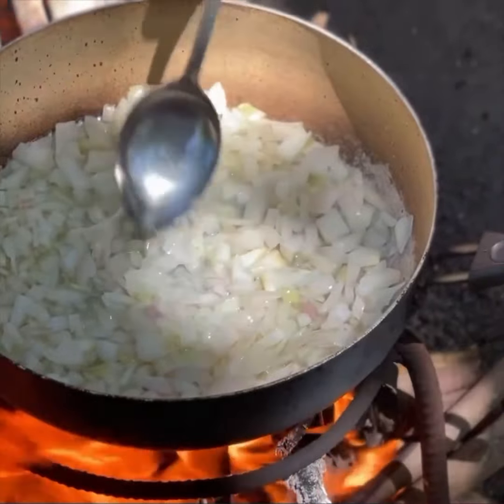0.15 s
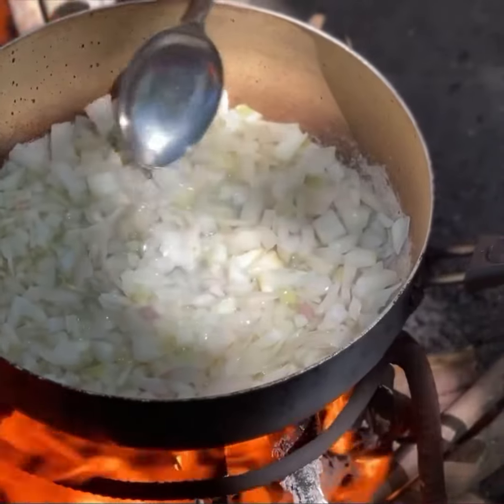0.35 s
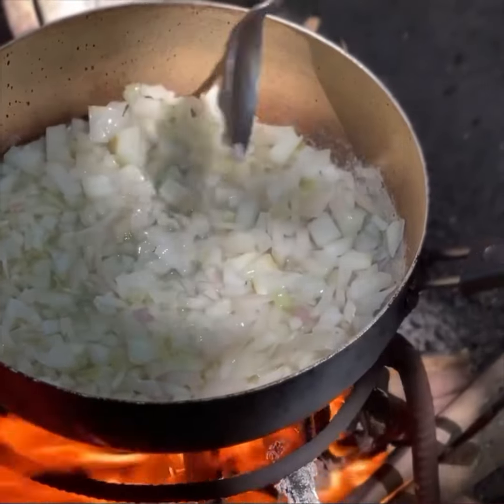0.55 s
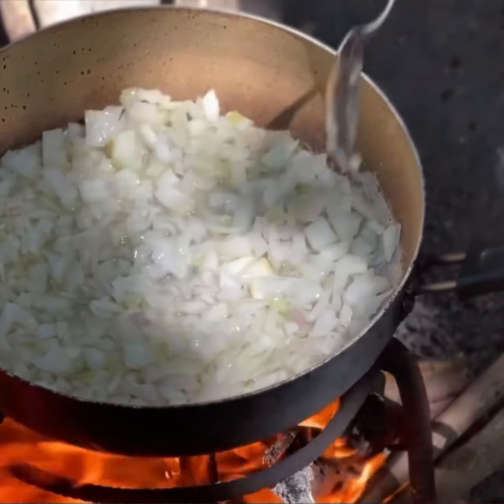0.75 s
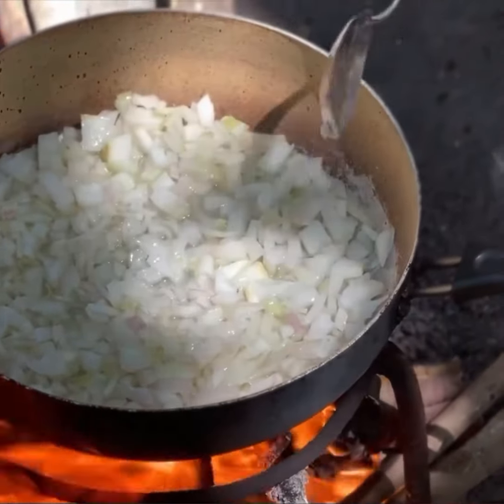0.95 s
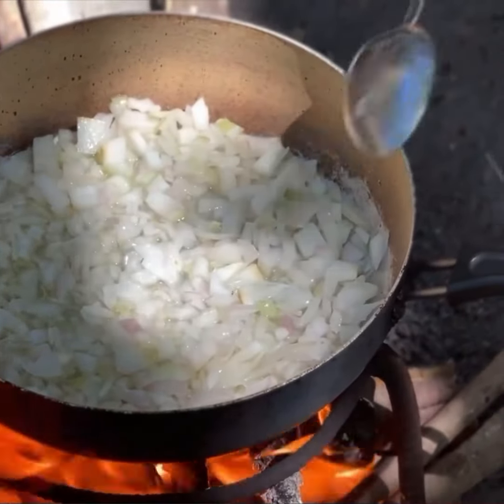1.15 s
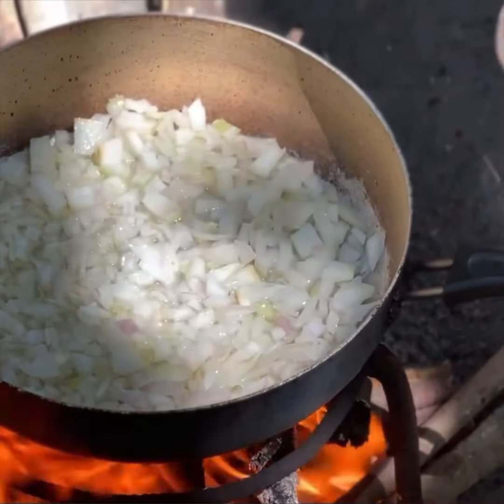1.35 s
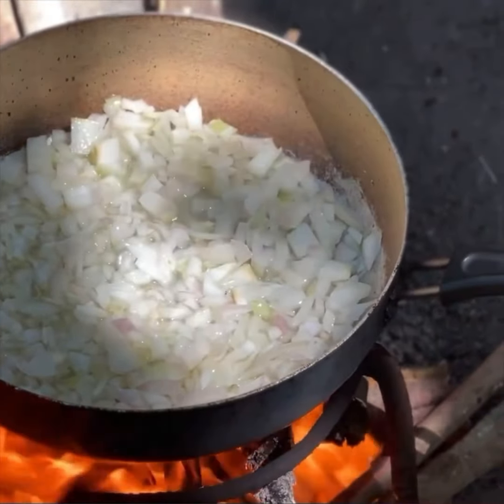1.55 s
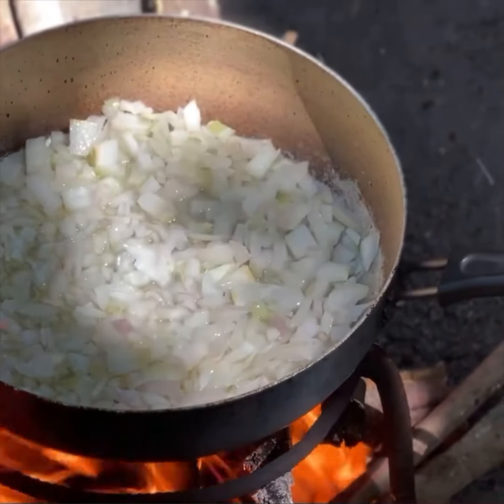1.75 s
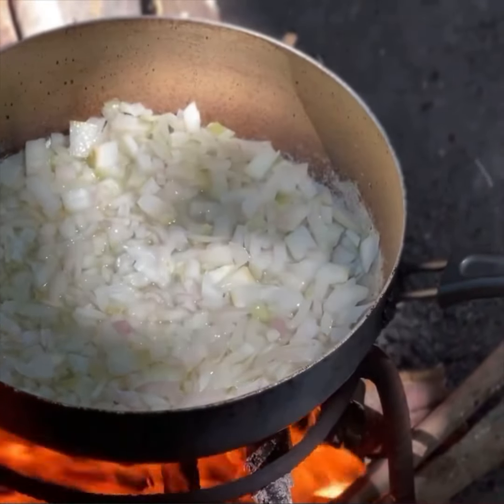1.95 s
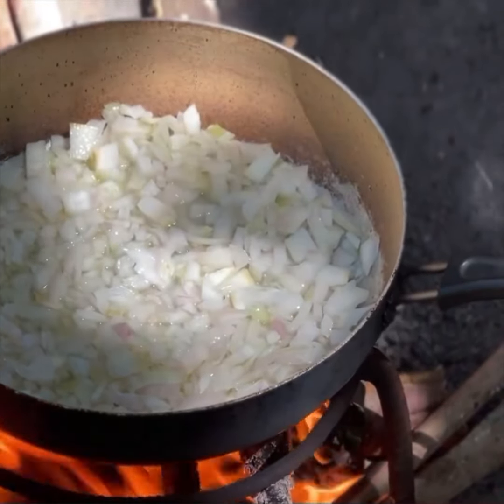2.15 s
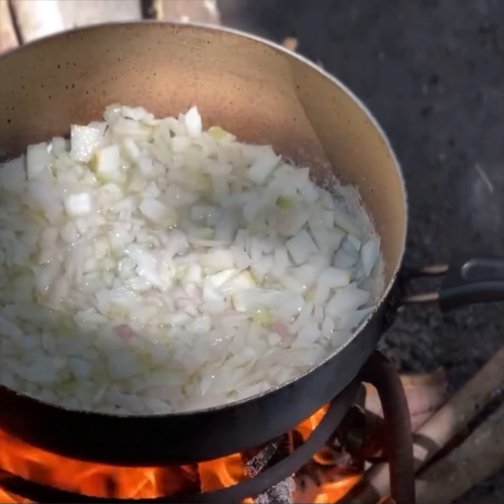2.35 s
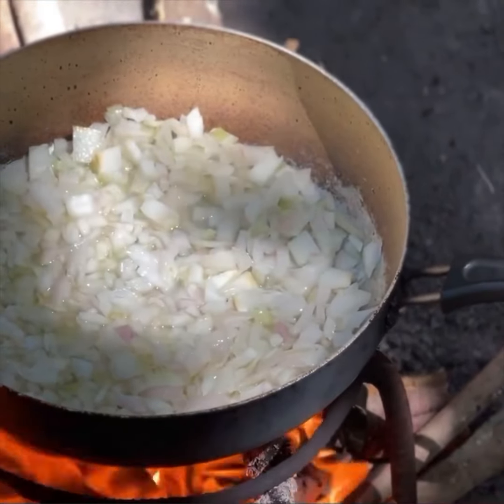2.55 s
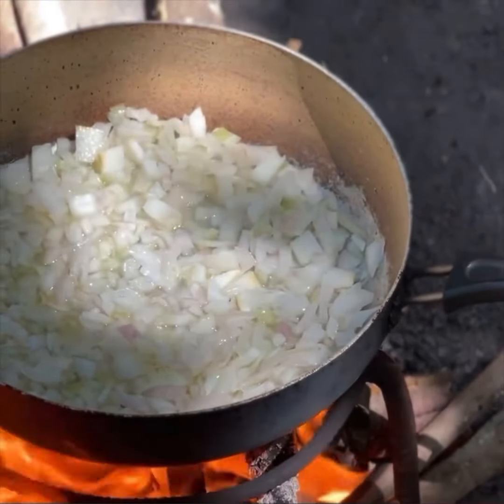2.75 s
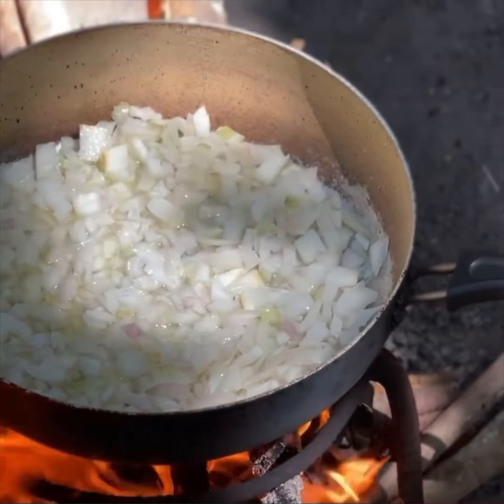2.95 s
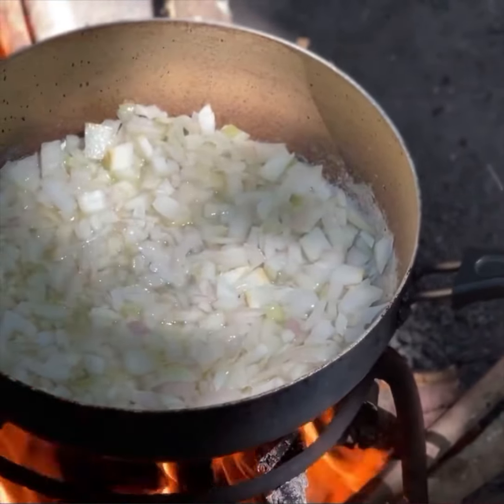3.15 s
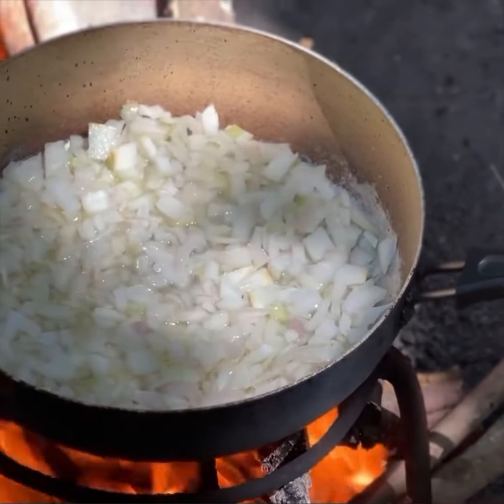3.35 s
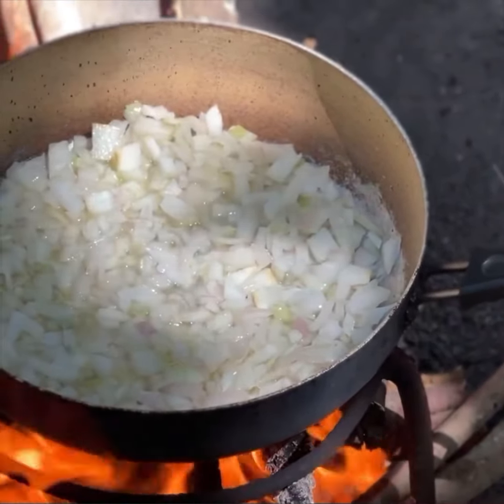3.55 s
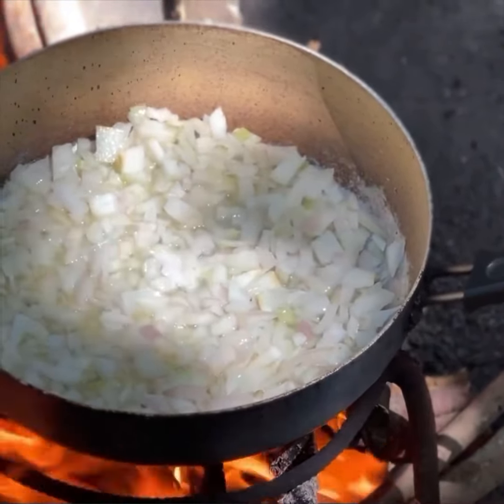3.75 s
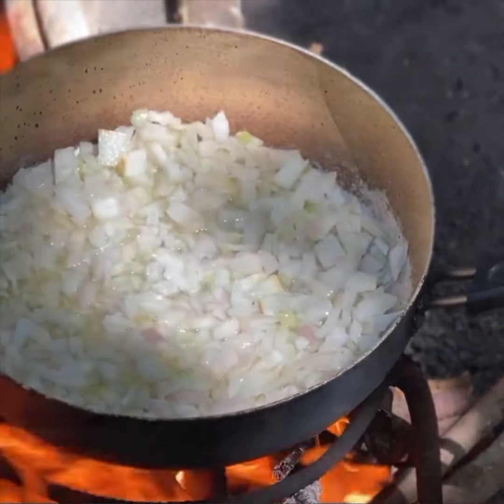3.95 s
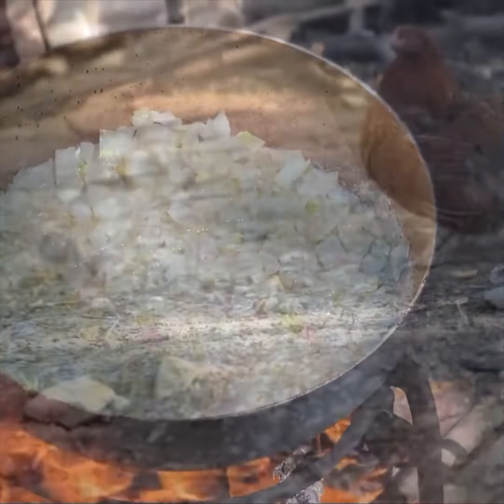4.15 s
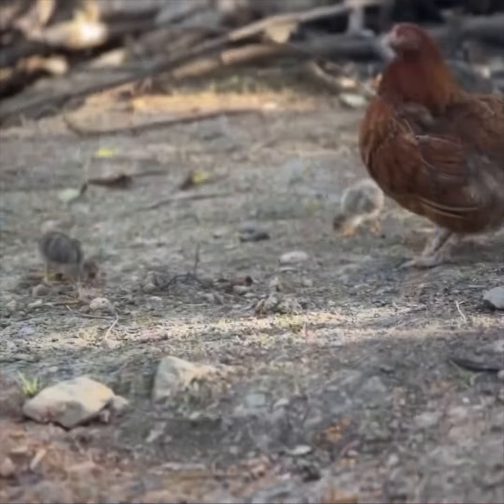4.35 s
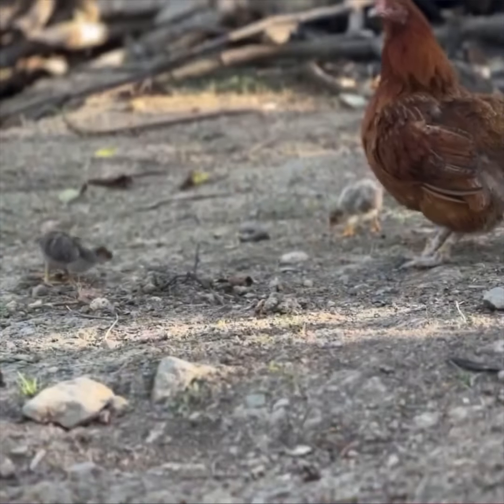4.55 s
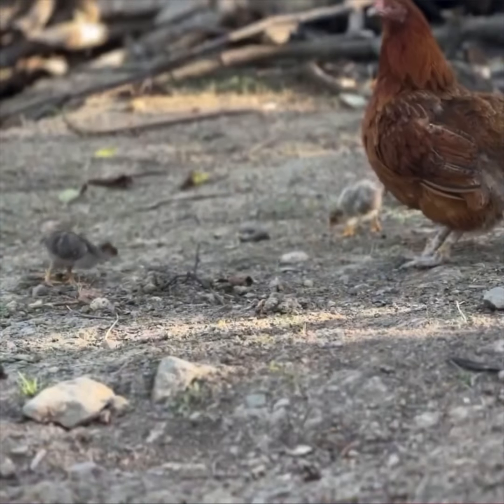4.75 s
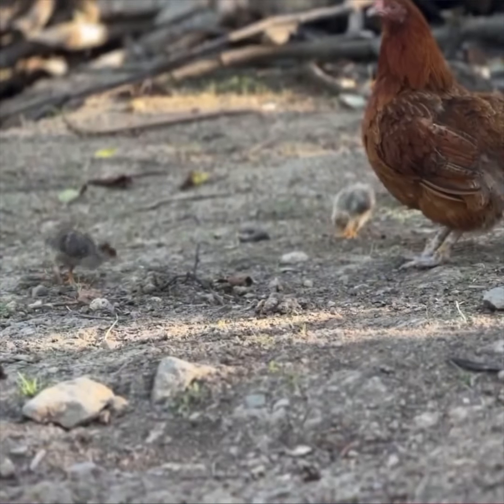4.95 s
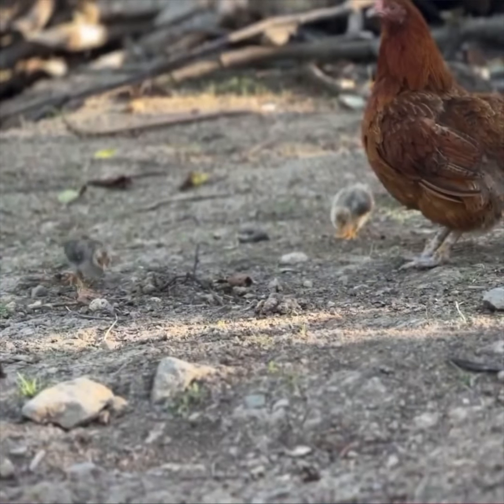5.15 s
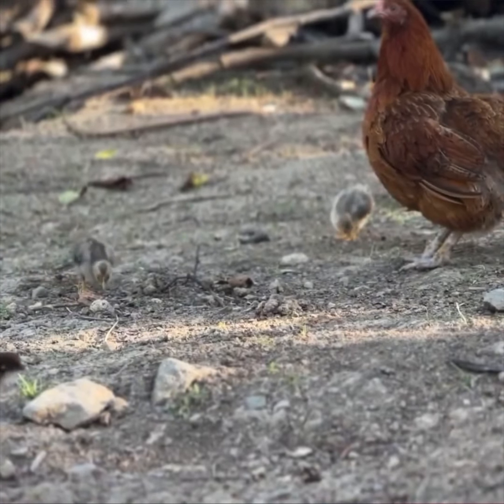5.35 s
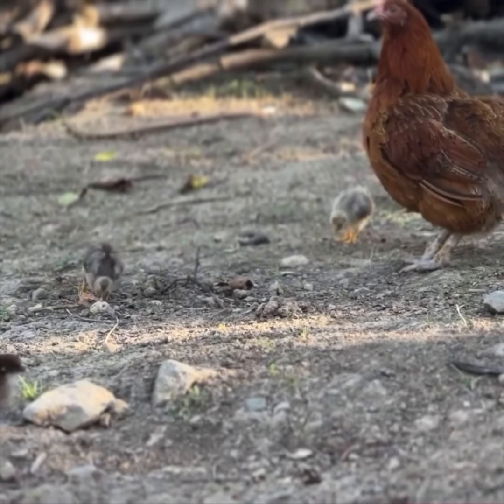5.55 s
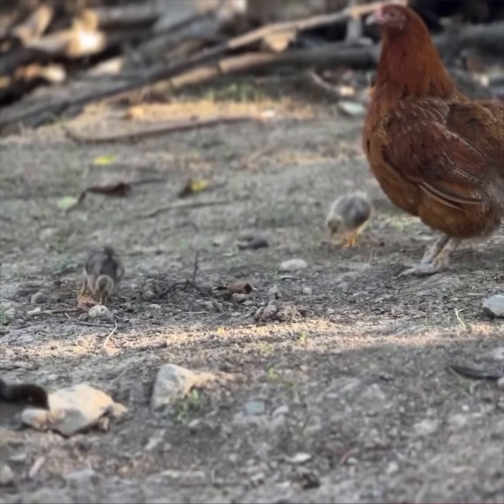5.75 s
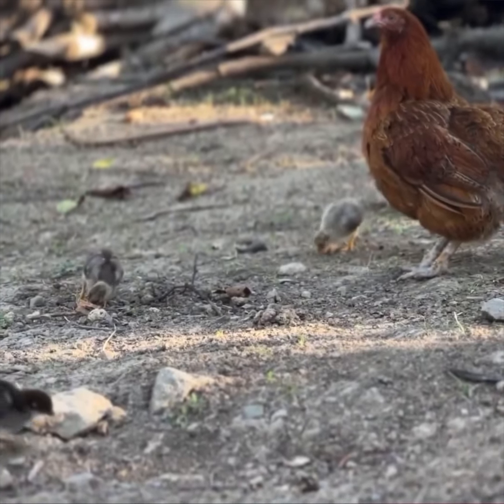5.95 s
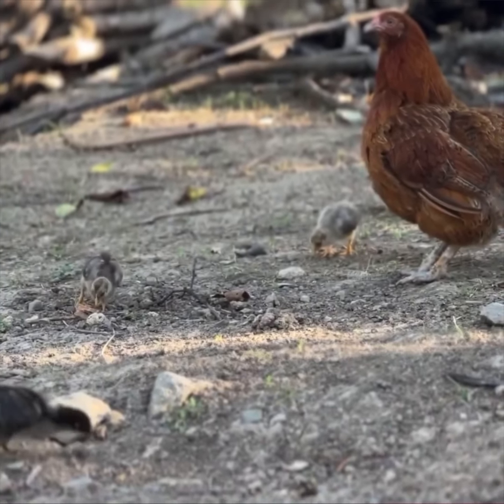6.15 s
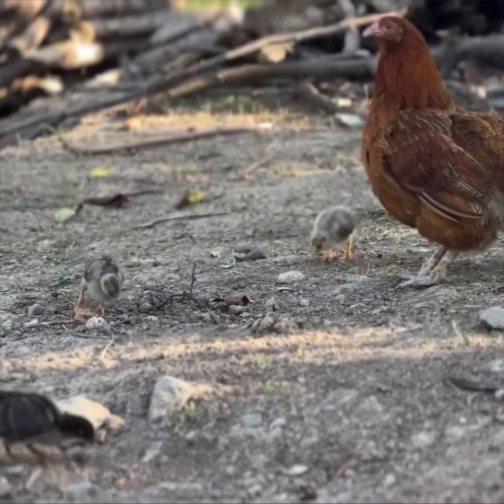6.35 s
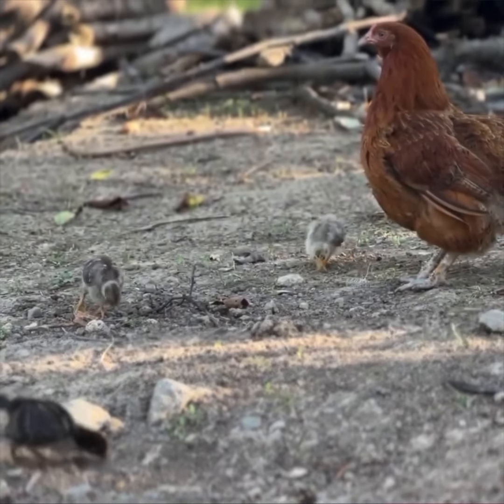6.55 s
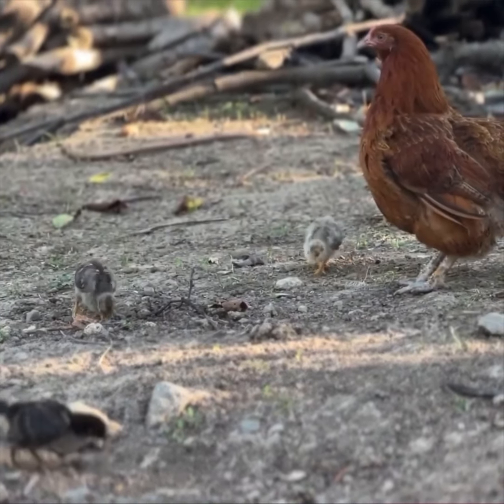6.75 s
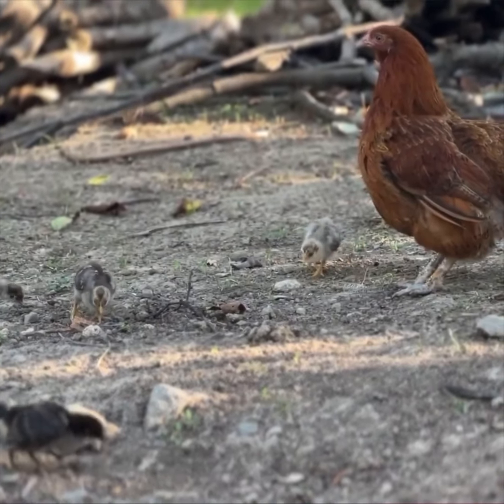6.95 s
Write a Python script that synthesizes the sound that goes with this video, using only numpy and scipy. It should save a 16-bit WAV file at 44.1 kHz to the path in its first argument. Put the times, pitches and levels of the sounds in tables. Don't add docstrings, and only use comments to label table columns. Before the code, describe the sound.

Loud frying with metal spoon knocks and wind thumps cuts abruptly to a hushed yard of soft chick peeps, pecks and insect hiss.

```python
import sys
import numpy as np
from scipy import signal
from scipy.fft import rfft, irfft, next_fast_len
from scipy.io import wavfile
from scipy.ndimage import uniform_filter1d, minimum_filter1d

SR = 44100
rng = np.random.default_rng(int(sys.argv[2]) if len(sys.argv) > 2 else 0)


def generate_wav(signal):
    frames = np.transpose(np.atleast_2d(signal))
    scaled = np.clip(frames, -1, 1) * 32767
    pcm = np.round(scaled).astype(np.int16)
    wavfile.write(sys.argv[1], SR, pcm)


def gain_from_db(level_db):
    decades = np.asarray(level_db, float) / 20
    return 10 ** decades


N = 313110

SCENE_CHANGE_S = 4.184

# time_s, level_db
PAN_HEAT = [
    (0.0, -24.5),
    (0.4, -24),
    (2.7, -23),
    (3.05, -22.5),
    (4.17, -20.5),
]
# freq_hz, density_db
FRY_SPECTRUM = [(250, 0), (490, -7.5), (800, -12.5), (1600, -7), (3500, -4), (4500, -4.5), (5400, -2.5),
                (9200, -2.5), (9700, -7), (10500, -6), (11900, -8), (12400, -13.5), (14300, -14.5),
                (15000, -11), (15600, -12)]
# freq_hz, side_over_mid_db
FRY_WIDTH = [(200, -20), (500, -10.5), (800, -8.5), (1200, -28), (3300, -23), (4500, -22.5), (8800, -51),
             (9400, -0.5), (10200, 0), (10800, -33), (15000, -26)]
BRIGHTER_DB_PER_OCTAVE_PER_DB = 0.25
# start_s, peak_db, pitch_hz
FAT_SPITS = [(0.6204, -9, 8450), (0.7472, -6, 10700), (0.9444, -12, 9120), (1.2074, -10, 8710),
             (1.4282, -5, 6270), (2.1074, -7, 6820), (2.3244, -9, 7930), (2.4634, -9, 8550),
             (2.8854, -9, 7240), (2.9537, -7, 5490), (3.3947, -10, 6670), (3.4446, -7, 6980),
             (3.7738, -6, 9280)]

# start_s, peak_db
RIM_KNOCKS = [
    (0.8038, 4),
    (0.8095, -3),
    (1.0372, 4),
    (1.0424, -2),
]
# pitch_hz, level_db, t60_s
RIM_MODES = [(588, 1, 0.052), (1544, -6.5, 0.13), (1920, -10, 0.023), (2770, -8, 0.027), (4050, -15, .05),
             (4440, -6.5, 0.16), (5000, 6.5, 0.022), (5600, -11, 0.096), (5960, 7.5, 0.031),
             (6740, -5, 0.064), (8300, 0, 0.041), (9800, -4.5, 0.036)]
# start_s, peak_db
HANDLE_RATTLES = [
    (0.837, -14),
    (0.847, 0),
    (0.861, -3),
    (0.874, -11),
    (0.881, -18),
    (1.051, -13),
    (1.063, -8),
    (1.070, -9),
    (1.077, -4),
]
HANDLE_HZ, HANDLE_T60_S = 530, 0.013
# start_s, peak_db
SPOON_LANDINGS = [
    (1.9598, 3.5),
    (1.992, -6),
    (1.997, -3),
]
# start_s, peak_db
SPOON_SETTLES = [
    (2.011, -14),
    (2.039, -17),
    (2.076, -11),
    (2.084, -26),
]
# pitch_hz, level_db, t60_s
SPOON_MODES = [(420, -12, .018), (960, -6, .028), (1250, -8, .016), (1770, 1, .022), (2030, -7, .016),
               (2330, 2, .022), (2700, -6, .016), (2990, -13, .22), (3410, -23, .08), (4040, -16, .04),
               (4780, -18, .02)]
# freq_hz, density_db
CRACK_SPECTRUM = [(150, -26), (250, -2.5), (1160, -3.5), (1640, -2), (2320, -9.5), (2670, -4), (3710, -11),
                  (4990, -6.5), (8550, -11), (16000, -32)]
# start_s, length_s, rms_db, centre_hz, width_hz
RUB_NOISES = [(0.024, 0.12, -39, 992, 25), (0.049, 0.065, -32.5, 400, 120),
              (0.73, 0.019, -15.5, 1730, 1480), (0.734, 0.015, -17.5, 365, 300),
              (0.81, 0.065, -21, 930, 900), (1.06, 0.056, -31, 940, 905), (.85, 0.028, -13, 510, 200),
              (1.055, 0.047, -17, 483, 250), (1.985, 0.11, -30, 2040, 1220),
              (2.071, 0.054, -30.5, 1700, 1500), (2.133, 0.069, -32, 940, 300), (2.2, 0.049, -30, 867, 300),
              (4.38, 0.04, -41, 1027, 150), (4.399, 0.076, -40, 1000, 250),
              (4.385, 0.08, -43.5, 1800, 1000), (5.663, 0.08, -54, 2900, 500),
              (6.365, 0.075, -50, 1070, 200)]

# start_s, length_s, middle_hz, peak_db
FALLING_PEEPS = [
    (4.245, 0.054, 2760, -40),
    (4.838, 0.043, 2970, -41.5),
    (4.983, 0.046, 2880, -43),
    (5.51, .03, 3020, -58),
    (5.98, 0.024, 3100, -57),
    (6.016, 0.044, 2830, -42.5),
    (6.33, .025, 2930, -57),
    (6.667, .02, 3040, -50),
    (6.751, .036, 2950, -46.5),
    (6.857, 0.051, 3020, -42.5),
]
# start_s, length_s, middle_hz, peak_db
RISING_PEEPS = [
    (4.226, .022, 2700, -51),
    (4.251, .011, 3350, -47),
    (4.303, .04, 5600, -63),
    (5.215, .03, 3170, -47),
    (6.255, .03, 3020, -46),
]
# start_s, length_s, middle_hz, peak_db
LEVEL_PEEPS = [
    (5.64, .03, 2950, -58),
    (5.685, .025, 2850, -55),
    (6.535, .015, 3500, -57),
    (6.9, .1, 3800, -66),
]
FALL_OCTAVES, RISE_OCTAVES, LEVEL_OCTAVES = -.31, .38, -.04
SWELL_DB, SWELL_AT = 8.0, .6
BEND = 0.5
NEAR_OCTAVE_DB, FAR_OCTAVE_DB = -13, -34
# start_s, peak_db, pitch_hz, t60_s
CLUCKS_AND_PECKS = [
    (4.376, -34, 683, 0.013),
    (4.38, -18.5, 557, 0.0047),
    (4.398, -22, 830, 0.0038),
    (4.4, -35, 1030, 0.0063),
    (4.415, -38, 1140, 0.0074),
    (4.431, -29, 705, 0.013),
    (4.45, -25, 985, 0.0073),
    (5.336, -29, 342, 0.0098),
    (5.832, -24, 610, 0.022),
]

# start_s, peak_db, pitch_hz, t60_s
WIND_BUFFETS = [(0.765, -13, 67.3, 0.05), (1.083, -7, 78.1, 0.036), (1.452, -9.5, 89, 0.03),
                (2.057, -12, 121, 0.1), (2.114, -22, 102, 0.066), (2.133, -7, 140, 0.065),
                (2.148, -12, 89, 0.075), (2.257, -6, 72, 0.06), (5.382, -18, 82, 0.058),
                (5.423, -22, 76, 0.13), (5.577, -12, 61.9, 0.026), (5.61, -13.5, 94.5, 0.029)]
# start_s, hold_s, level_db, flutter_over_deep_db
GUSTS_AT_FIRE = [(0.07, .1, -28.5, -11), (0.4, 0.08, -33, 2.5), (0.61, 0.06, -31.5, 3.5),
                 (0.756, .03, -35, 1), (0.863, 0.17, -35, 7), (1.082, .03, -36, 16.5),
                 (1.184, 0.081, -38.5, 9), (1.44, 0.021, -33, -6), (1.573, 0.11, -38.5, -8),
                 (1.94, 0.026, -27.5, -11), (2.073, 0.028, -29.5, 10), (2.147, 0.027, -12.5, -2),
                 (2.205, .23, -15, -11.5), (2.532, 0.011, -25.5, 5), (2.692, .19, -21, -3),
                 (2.97, 0.23, -32.5, -7.5), (3.24, 0.11, -27, -3.5), (3.49, 0.16, -37.5, -5),
                 (3.857, 0.03, -24, -4), (3.973, 0.058, -24.5, 6), (4.099, 0.033, -26, 6),
                 (4.155, 0.013, -19.5, -8)]
# start_s, hold_s, level_db, flutter_over_deep_db
GUSTS_IN_YARD = [(4.25, 0.31, -42.5, 4), (4.64, 0.092, -39.5, 3.5), (4.81, 0.083, -36.5, -7),
                 (4.982, .03, -35.5, -2), (5.096, 0.054, -35.5, -14), (5.22, .02, -36, 3),
                 (5.355, 0.1, -33.5, -9), (5.575, 0.035, -32.5, 2), (5.76, 0.11, -48, 6),
                 (6.298, 0.026, -47, 15), (6.4, .02, -36.5, -4), (6.505, 0.28, -39.5, 3),
                 (6.71, 0.14, -33, -2), (6.917, .15, -33, 1)]
# freq_hz, density_db
WIND_SPECTRUM = [(12, -46), (20, -5), (53, 0.5), (75, 4.5), (114, -6), (145, -8), (184, -14.5), (307, -26),
                 (520, -44), (600, -34), (780, -71), (1320, -120)]
BREEZE_FIRE_DB, BREEZE_YARD_DB = -43, -53
GUST_RISE_DB_PER_S, GUST_FALL_DB_PER_S = 258, 208

# freq_hz, density_db
YARD_SPECTRUM = [(200, -0.5), (400, -7), (1000, -14), (2400, -16), (3400, -17.5), (4500, -22.5),
                 (6000, -25), (9000, -24.5), (9600, -39), (10200, -31), (12300, -34), (12900, -43),
                 (15800, -41), (16300, -60)]
# freq_hz, side_over_mid_db
YARD_WIDTH = [(200, -13), (400, -6), (800, -2), (1500, -1.5), (2600, -7.5), (4000, -16.5), (5000, -38),
              (9200, -30), (9900, -3), (10600, -30), (15000, -40)]
# freq_hz, density_db
INSECT_SPECTRUM = [(3650, -51), (6200, -62), (6500, 0.5), (7100, 11), (7470, 15), (7860, 8), (8250, -7),
                   (9400, -58), (12200, -53), (20700, -120)]
AIR_DB, INSECT_DB = -41.5, -48.5


def rms_one(x):
    return x / np.sqrt(np.mean(x ** 2) + 1e-20)


def in_time(rows):
    time_s, *columns = np.transpose(rows)
    return [np.interp(np.arange(N) / SR, time_s, column) for column in columns]


def at_hz(points, hz):
    points = np.array(points)
    return np.interp(np.log(hz), np.log(points[:, 0]), points[:, 1])


def drift(rate_hz):
    pole = np.exp(-80 * np.pi * rate_hz / SR)
    noise = rng.standard_normal(N // 40 + 2002)
    slow = signal.lfilter([1], [1, -2 * pole, pole * pole], noise)[2000:]
    return np.interp(np.arange(N) / 40, np.arange(len(slow)), rms_one(slow))


def ring(clicks, hz, t60_s):
    radius = gain_from_db(-60 / (max(t60_s, 1e-3) * SR))
    angle = 2 * np.pi * hz / SR
    return signal.lfilter([0, np.sin(angle)], [1, -2 * radius * np.cos(angle), radius * radius], clicks + 1e-18)


def coloured(mid, spectrum, width, band_db, count=12):
    size = next_fast_len(N)
    hz = np.maximum(np.arange(size // 2 + 1) * SR / size, 1)
    pair = rfft([rms_one(mid), rng.standard_normal(N)], size) * gain_from_db(at_hz(spectrum, hz))
    pair[1] *= gain_from_db(at_hz(width, hz))
    pair /= np.sqrt(np.mean(irfft(pair[0], size) ** 2))
    centres_hz = np.geomspace(spectrum[0][0], spectrum[-1][0], count)
    out = 0
    for k, centre_hz in enumerate(centres_hz):
        share = np.interp(np.log(hz), np.log(centres_hz), np.arange(count) == k)
        out = out + irfft(pair * share, size)[:, :N] * gain_from_db(band_db(centre_hz))
    return np.array([out[0] + out[1], out[0] - out[1]])


def single_rings(rows, soft_s, swelling=False):
    out = np.zeros(N)
    push = np.hanning(round(soft_s * SR) + 3)
    for start_s, db, hz, t60_s in rows:
        at = round(start_s * SR)
        contact = np.zeros(min(SR // 8, N - at))
        contact[:len(push)] = push
        tone = ring(contact, hz, t60_s)
        if swelling:
            tone = ring(tone, hz, t60_s)
        out[at:at + len(tone)] += gain_from_db(db) * tone / np.abs(tone).max()
    return out


def struck(hits, modes, scatter_s, damping, ring_db, crack_db, crack_s, spray_share=0.31):
    out = np.zeros((2, N))
    t = np.arange(SR // 4) / SR
    hz_axis = np.maximum(np.arange(len(t) // 2 + 1) * SR / len(t), 1)
    crack_gain = gain_from_db(at_hz(CRACK_SPECTRUM, hz_axis))
    for start_s, db in hits:
        spray = spray_share * rng.standard_normal(len(t)) * np.exp(-t / scatter_s)
        spray[0] += 1
        body = 0
        for k, (hz, level_db, t60_s) in enumerate(modes):
            body = body + (-1) ** k * gain_from_db(level_db) * ring(spray, hz, min(t60_s, .25) * damping)
        mid, side = rms_one(irfft(rfft(rng.standard_normal((2, len(t)))) * crack_gain, len(t)))
        dying = np.exp(-t / crack_s) + gain_from_db(-13) * np.exp(-t / (3.45 * crack_s))
        crack = (mid + .3 * side * np.array([[1], [-1]])) * dying
        out[:, round(start_s * SR):][:, :len(t)] += gain_from_db(db) * (gain_from_db(ring_db) * body + gain_from_db(crack_db) * crack)
    return out


def frying():
    level_db, = in_time(PAN_HEAT)
    tilt_db = 0.13 + BRIGHTER_DB_PER_OCTAVE_PER_DB * (level_db + 24.5)
    sizes = gain_from_db(1.2 * np.minimum(rng.exponential(1, N), 5)) * rng.choice([-1, 1], N)
    bursts_per_s = 6000 * gain_from_db(1.5 * drift(25))
    bursts = sizes * (rng.random(N) < bursts_per_s / SR)
    splash = rng.standard_normal(66) * np.exp(-np.arange(66) / 18)
    snaps = np.convolve(sizes * (rng.random(N) < 60 / SR), splash / np.linalg.norm(splash))[:N]
    mix = rms_one(bursts) + 0.76 * rng.standard_normal(N) + 2.8 * snaps
    together_db = 0.64 * drift(2.8)

    def band_db(hz):
        jets_db = 1.5 * np.clip(drift(20), 0, 2.2) ** 2
        return level_db - .6 + tilt_db * np.log2(hz / 6000) + together_db + jets_db

    return coloured(mix, FRY_SPECTRUM, FRY_WIDTH, band_db, count=22)


def fat_spits():
    return single_rings([(s, db - .3, hz, 4.0 / hz) for s, db, hz in FAT_SPITS], 0, swelling=True)


def rim_knocks():
    rattles = [(s, db, HANDLE_HZ * rng.uniform(0.85, 1.14), HANDLE_T60_S) for s, db in HANDLE_RATTLES]
    rim = struck(RIM_KNOCKS, RIM_MODES, 0.002, 0.78, ring_db=-16, crack_db=-4.0, crack_s=0.0076)
    return rim + single_rings(rattles, 0.00013, swelling=True)


def spoon_laid():
    landing = struck(SPOON_LANDINGS, SPOON_MODES, .002, .9, ring_db=-9, crack_db=-15, crack_s=.003,
                     spray_share=.08)
    return landing + struck(SPOON_SETTLES, SPOON_MODES, .003, .4, ring_db=-8, crack_db=-10, crack_s=.003)


def rubs():
    out = np.zeros(N)
    for start_s, length_s, db, hz, width_hz in RUB_NOISES:
        noise = rng.standard_normal(SR // 4)
        t60_s = 3.5 / width_hz
        tone = ring(ring(noise, hz, t60_s), hz, t60_s)[2000:2000 + round(length_s * SR)]
        out[round(start_s * SR):][:len(tone)] += gain_from_db(db) * rms_one(tone) * np.sqrt(np.hanning(len(tone)))
    return out


def chicks():
    out = np.zeros(N)
    calls = [(*row, FALL_OCTAVES) for row in FALLING_PEEPS]
    calls += [(*row, RISE_OCTAVES) for row in RISING_PEEPS]
    calls += [(*row, LEVEL_OCTAVES) for row in LEVEL_PEEPS]
    for k, (start_s, length_s, hz, db, glide_octaves) in enumerate(calls):
        t = np.arange(-.004, length_s + 0.0058, 1 / SR)
        along = t / length_s
        bent = along - .5 + BEND * (along ** 2 - along)
        phase = 2 * np.pi * np.cumsum(hz * 2 ** (glide_octaves * bent)) / SR
        swell_db = db + 6.5 - SWELL_DB * (2 * (along - SWELL_AT)) ** 2
        shape = gain_from_db(swell_db) * signal.windows.tukey(len(t), .4)
        octave = gain_from_db((FAR_OCTAVE_DB if k else NEAR_OCTAVE_DB) + 4 - 20 * along ** 2)
        call = shape * (np.sin(phase) + octave * np.sin(2 * phase))
        out[round((start_s + t[0]) * SR):][:len(t)] += call
    return out + gain_from_db(-13) * np.roll(out, round(0.008 * SR))


def clucks_and_pecks():
    return single_rings(CLUCKS_AND_PECKS, 0.00037)


def wind_buffets():
    return single_rings(WIND_BUFFETS, 0.0025)


def wind():
    t = np.arange(0, N, 32) / SR
    deep_db = upper_db = np.where(t < SCENE_CHANGE_S, BREEZE_FIRE_DB, BREEZE_YARD_DB)
    for start_s, hold_s, db, flutter_db in GUSTS_AT_FIRE + GUSTS_IN_YARD:
        before_db = GUST_RISE_DB_PER_S * (start_s - t)
        after_db = GUST_FALL_DB_PER_S * (t - start_s - hold_s)
        gust_db = db - np.maximum(0, np.maximum(before_db, after_db))
        gust_db[(t < SCENE_CHANGE_S) != (start_s < SCENE_CHANGE_S)] = -99
        deep_db = np.maximum(deep_db, gust_db)
        upper_db = np.maximum(upper_db, gust_db + flutter_db)
    deep_db, upper_db = in_time(np.transpose([t, deep_db, upper_db]))
    lumps_db = 3.37 * drift(13.4)

    def band_db(hz):
        return (deep_db + 0.29 if hz < 95 else upper_db + 5.5) + lumps_db

    return coloured(rng.standard_normal(N), WIND_SPECTRUM, [(40, -17), (70, -12), (300, -13)], band_db, count=6)


def insects():
    throb = gain_from_db(2.0 * drift(180) + 0.59 * drift(5.7)) * rng.standard_normal(N)
    return coloured(throb, INSECT_SPECTRUM, [(6000, -37), (9000, -27)],
                    lambda hz: INSECT_DB + 0.34 * drift(21), count=3)


def yard_air():
    return coloured(rng.standard_normal(N), YARD_SPECTRUM, YARD_WIDTH,
                    lambda hz: AIR_DB + 0.96 * drift(19), count=7)


def scene():
    at_fire = np.clip((SCENE_CHANGE_S - np.arange(N) / SR) / .003, 0, 1)
    rim_pan = gain_from_db(np.array([[.8], [-.8]]))
    chick_pan = gain_from_db(np.array([[1.5], [-1.5]]))
    backgrounds = frying() * at_fire + (insects() + yard_air()) * (1 - at_fire) + wind()
    centred = fat_spits() + rubs() + clucks_and_pecks() + wind_buffets()
    return backgrounds + centred + spoon_laid() + rim_knocks() * rim_pan + chicks() * chick_pan


def low_pass(x):
    return signal.sosfilt(signal.butter(12, 15940, fs=SR, output="sos"), x)


def record(dry):
    dry = signal.sosfilt(signal.butter(3, 42, "high", fs=SR, output="sos"), dry)
    dry = signal.sosfilt(signal.ellip(12, .5, 60, 15800, fs=SR, output="sos"), dry)
    over_db = np.maximum(20 * np.log10(np.abs(dry).max(axis=0) + 1e-9) + 0.25, 0)
    ahead = round(0.019 * SR)
    recovery_db = 120 * np.arange(N) / SR
    peak_db = -minimum_filter1d(-over_db, 2 * ahead)
    held_db = np.maximum.accumulate(peak_db + recovery_db) - recovery_db
    duck_db = uniform_filter1d(held_db, ahead)
    mix = np.clip(dry * gain_from_db(-.4 * duck_db), -1, 1)
    return low_pass(mix)


dry = scene()
out = record(dry)
generate_wav(out)
```